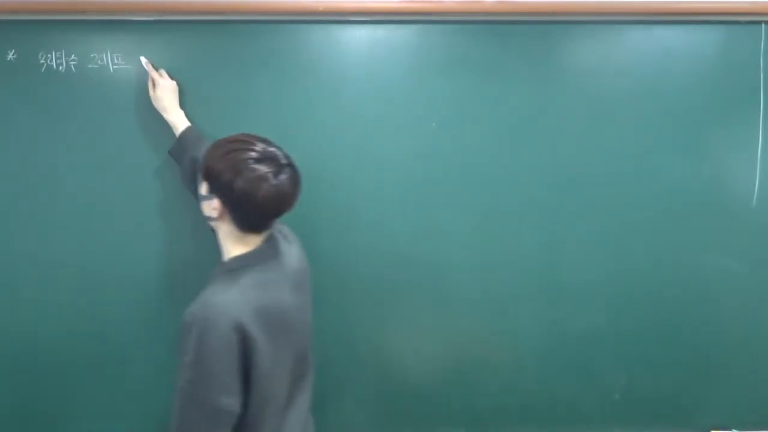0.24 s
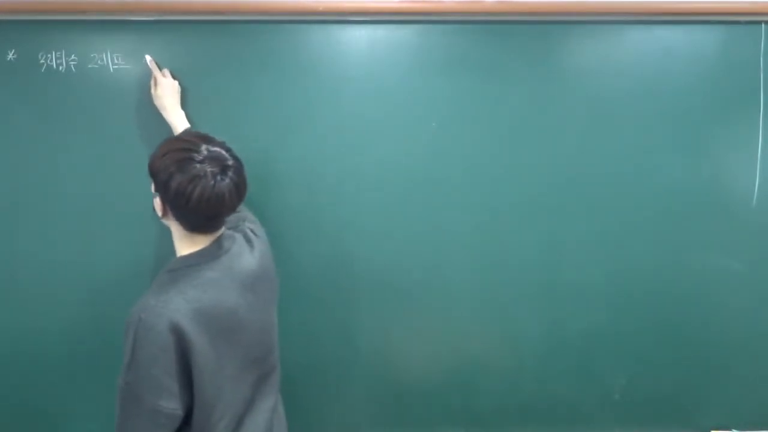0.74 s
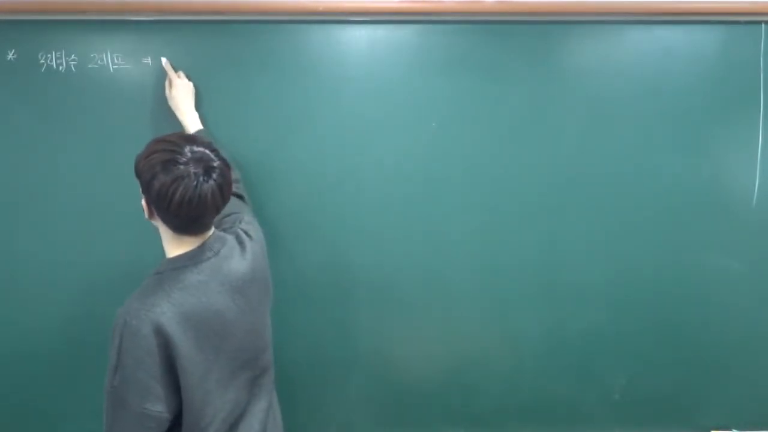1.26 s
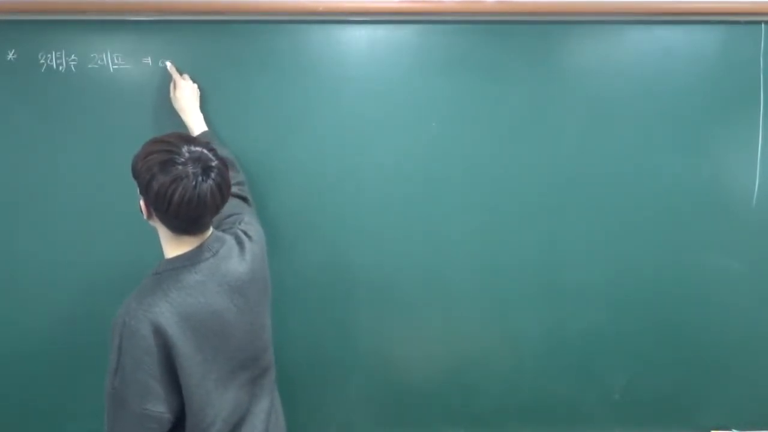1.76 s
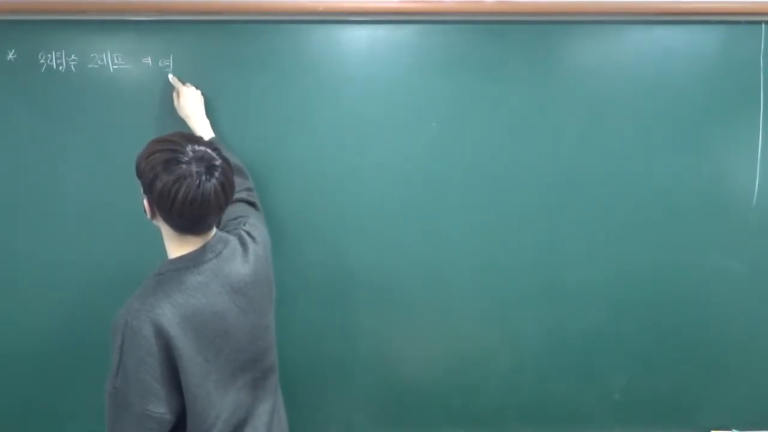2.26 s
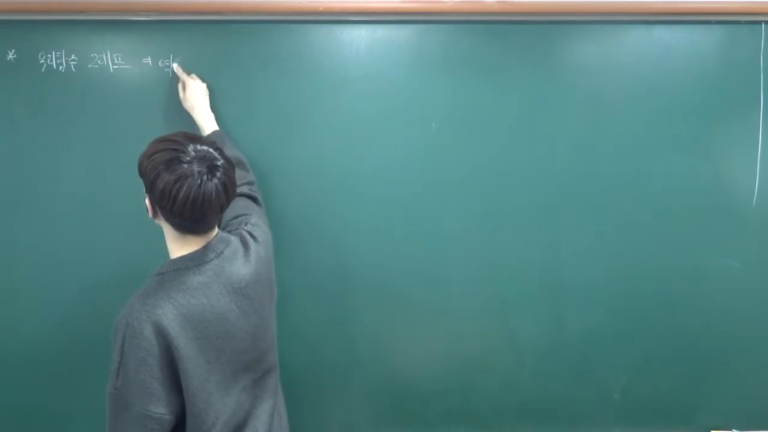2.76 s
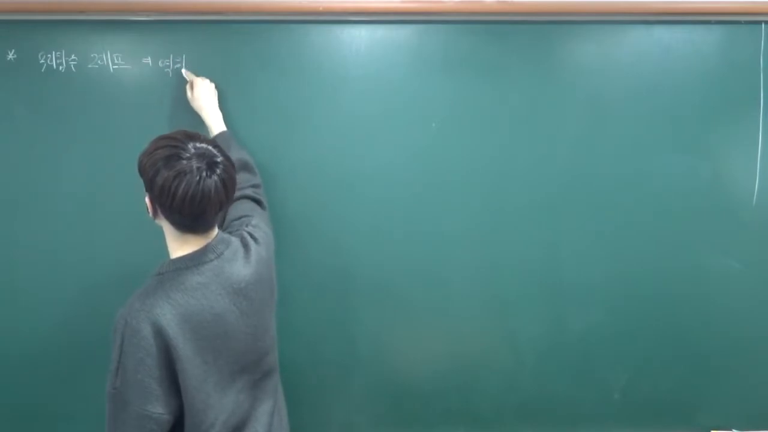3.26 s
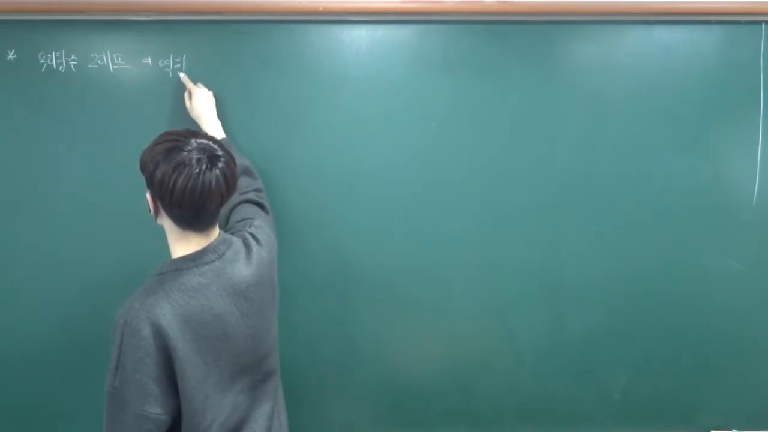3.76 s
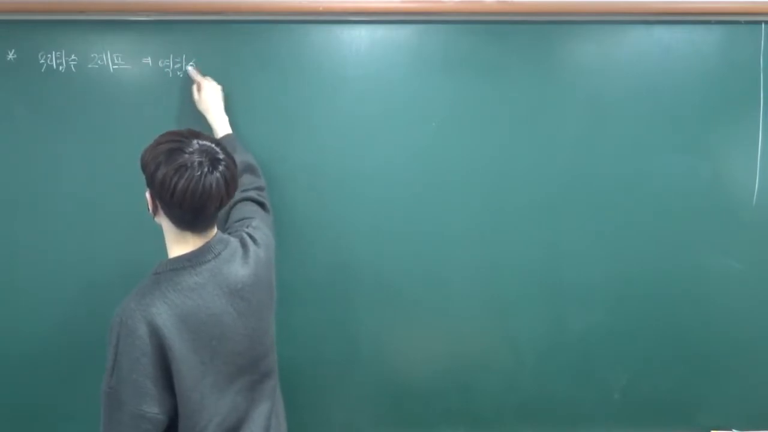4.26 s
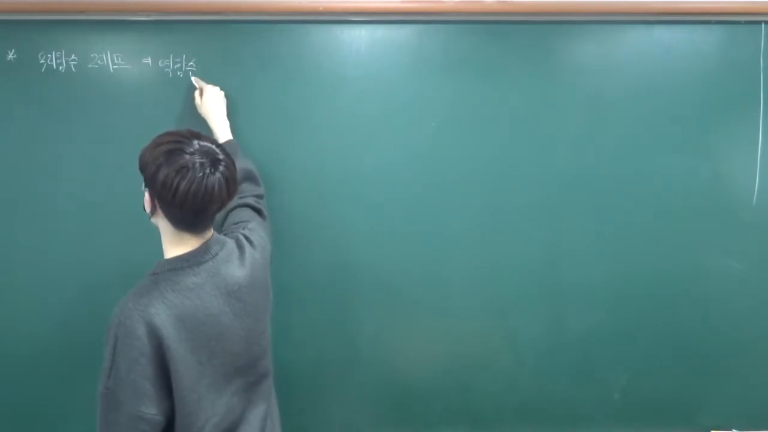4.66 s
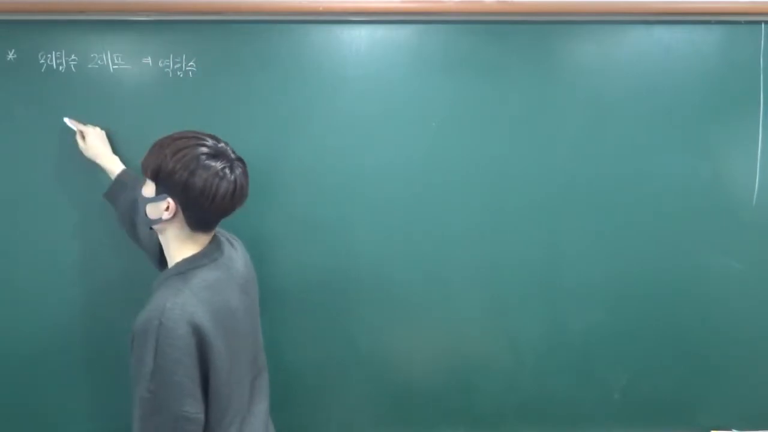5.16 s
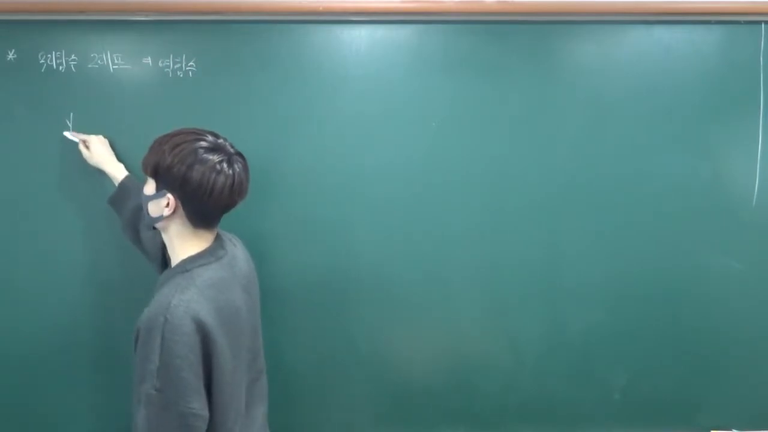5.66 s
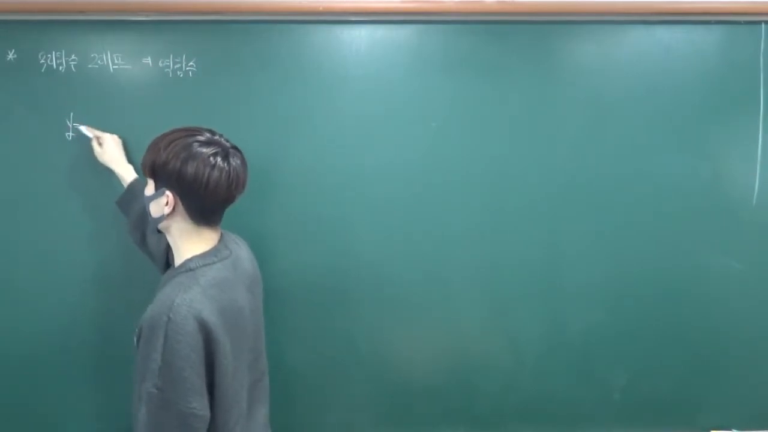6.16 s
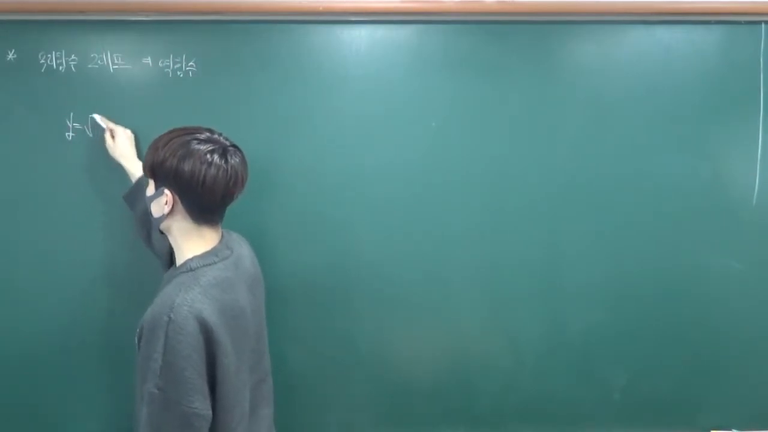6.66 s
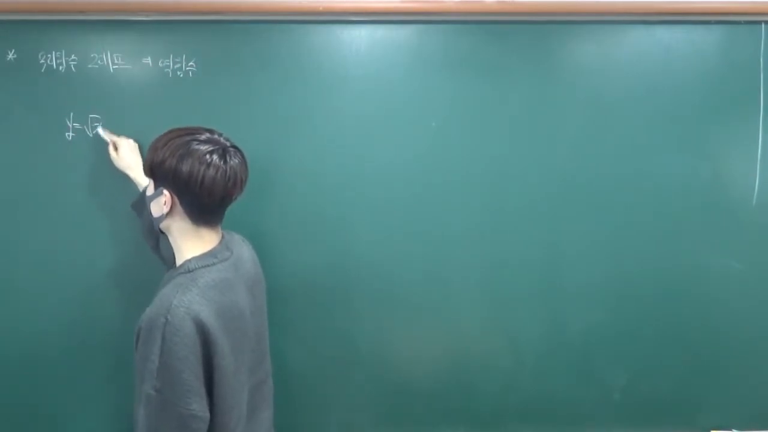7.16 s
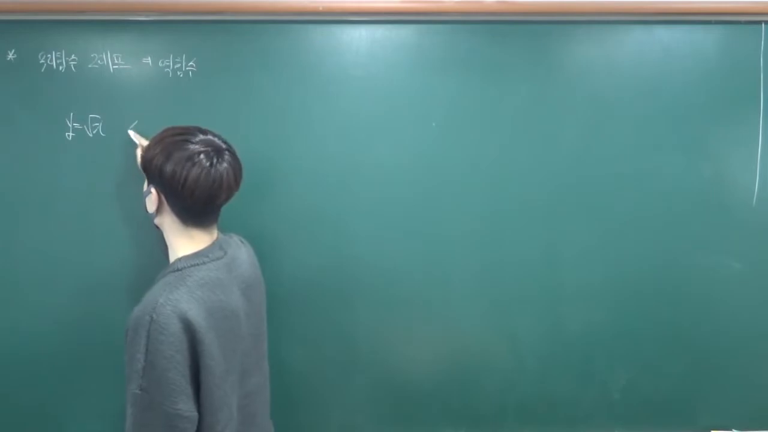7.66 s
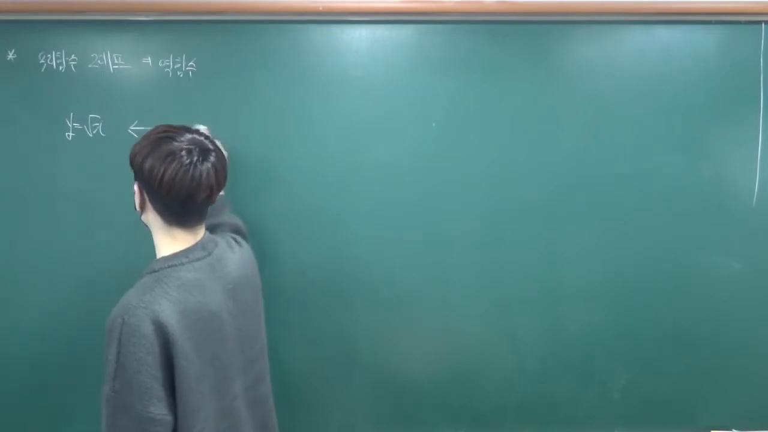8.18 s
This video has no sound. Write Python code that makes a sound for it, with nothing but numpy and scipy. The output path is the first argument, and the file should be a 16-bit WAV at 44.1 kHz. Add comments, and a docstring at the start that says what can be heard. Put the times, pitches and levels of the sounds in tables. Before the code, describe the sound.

Chalk taps and scrapes quickly across a blackboard in a bare classroom, with a few dull bumps over quiet ventilation.

```python
"""Someone writes quickly with chalk on a large blackboard in a bare classroom.
Over quiet ventilation and faint electronic ticking, a scrape and a dull bump come first. Then each
stroke starts with a tap: the tip clicks, the board knocks and the room rings on. A very faint hiss
passes near 1.3 s. Bumps fall between taps, some strokes drag, and the chalk squeaks near 2.4 s. At 5 s
a second line of writing begins, with a slightly different tone. A last drag and a soft bump end it."""
import sys
import numpy as np
from scipy import signal
from scipy.fft import rfft, irfft
from scipy.io import wavfile
from scipy.ndimage import uniform_filter1d

SR = 44100
rng = np.random.default_rng(int(sys.argv[2]) if len(sys.argv) > 2 else 0)


def master_out(mix):
    """Clip the mix to full scale and print it as 16-bit PCM to the path in sys.argv[1]."""
    frames = np.transpose(np.atleast_2d(mix))
    ceiling = np.clip(frames, -1, 1)
    pcm = np.round(ceiling * 32767).astype(np.int16)
    wavfile.write(sys.argv[1], SR, pcm)


N = 371322
T = np.arange(int(.9 * SR)) / SR  # seconds since a hit


def gain_of(db):
    """Turns decibels into a number to multiply by."""
    return 10 ** (np.asarray(db) / 20)


def read(points, hz):
    """Looks up a pitch in a table, sliding smoothly between its rows."""
    f, value = np.transpose(points)
    return np.interp(np.log(hz + 1), np.log(f + 1), value)


def unit(x):
    """Scales a sound to an energy of one."""
    return x / np.sqrt(np.sum(x ** 2, -1, keepdims=True) + 1e-20)


def add(mix, s, sound):
    """Lays a sound into the mix at s seconds."""
    part = mix[:, max(round(s * SR), 0):][:, :sound.shape[-1]]
    part += sound[..., :part.shape[1]]


def colour(x, db_at, size=4096):
    """Changes the tone: turns each pitch up or down by db_at(Hz) decibels."""
    log_gain = np.log(gain_of(db_at(abs(np.fft.fftfreq(size, 1 / SR)))))
    kernel = np.fft.ifft(np.exp(np.conj(signal.hilbert(log_gain)))).real[:size // 2]
    return signal.oaconvolve(x, kernel[None], axes=1)[:, :x.shape[1]]


# how strong the side is next to the mid: f/Hz, level/dB
STEREO_WIDTH = [(60, -17), (500, -17.5), (1100, -19.5), (1800, -20.5), (2500, -13), (3700, -23),
                (4600, -14), (5150, 0), (5900, -12.5), (7200, -17), (10000, -16), (15000, -68)]
def diffuse(noise):
    """Sound from all around. Row 0 (mid) is what left and right share; row 1 (side) sets them apart."""
    return np.vstack([noise[:1], colour(noise[1:], lambda hz: read(STEREO_WIDTH, hz))])


# tone of the moving air: f/Hz, level/dB
AIR_TONE = [(22, -14), (38, -9), (55, 8), (75, -0.5), (120, -1.5), (250, -6), (500, -12.5), (1000, -15.5),
            (2000, -18.5), (4500, -31.5), (8000, -31), (16000, -25)]
def ventilation(air_db=-25, rumble_hz=70, rumble_start_db=-8.5, rise_s=3.7):
    """A steady rush of air with a thin hiss on top; its deepest rumble slowly grows."""
    noise = diffuse(rng.standard_normal((2, N)))
    air = gain_of(air_db) * colour(noise, lambda hz: read(AIR_TONE, hz), size=8192)
    thin = colour(air, lambda hz: rumble_start_db / (1 + (hz / rumble_hz) ** 4), size=8192)
    grown = np.minimum(np.arange(N) / SR / rise_s, 1) ** 2
    return thin + grown * (air - thin)


def blip(hz, db, length):
    """A short tone that swells and fades."""
    t = np.arange(int(length * SR)) / SR
    return gain_of(db) * np.hanning(len(t)) * np.sin(2 * np.pi * (hz * t + rng.random()))


# the two tones of a tick: f/Hz, level/dB, length/s
TICK_TONES = [(2635, -48.5, .009), (3970, -58, 0.015)]
def ticking(first_s=0.011, ticks_per_s=29.97, uneven_db=1.4, waver=0.0091):
    """Faint, regular electronic blips, a little uneven in strength and pitch."""
    out = np.zeros((2, N))
    times = np.arange(first_s, N / SR, 1 / ticks_per_s)
    for hz, db, length in TICK_TONES:
        for s, (strength, bend) in zip(times, rng.standard_normal((len(times), 2))):
            tick = blip(hz * (1 + waver * bend), db + uneven_db * strength, length)
            add(out[:1], s - length / 2, tick)
    return out


# how long board and room ring together: f/Hz, time to fade by 60 dB/s
RING_TIMES = [(100, 1), (250, 0.91), (500, 0.49), (1200, .48), (3000, 0.4), (7000, 0.42), (15000, 0.26)]
def room_ring(noise, size=256):
    """Countless echoes blur into one tail, in which each pitch fades at its own speed."""
    hz, t, spectrum = signal.stft(noise, SR, nperseg=size)
    fade = gain_of(-60 * t / read(RING_TIMES, hz)[:, None])
    tail = signal.istft(spectrum * fade, SR, nperseg=size)[1]
    return diffuse(unit(tail[:, :len(T)]))


# the board's own notes: f/Hz, level/dB, time to fade by 60 dB/s
BOARD_NOTES = [(127.8, -19, 0.96), (277.4, -26.5, 0.83), (453.3, -21, 0.47), (653.4, -26, 0.33),
               (676.6, -23, 0.055), (732, -29, 0.43), (1070, -30.5, 0.46), (1306, -33, 0.31)]
def board():
    """One hit sets all the notes ringing; the square root evens out long and short notes' energy."""
    return sum(gain_of(db - 60 * T / fade_s) * np.sin(2 * np.pi * hz * T)
               / np.sqrt(fade_s * SR / np.log(1e12)) for hz, db, fade_s in BOARD_NOTES)


# dull bumps: t/s, level/dB, boom f/Hz, rise time/s
BUMP_HITS = [(0.0475, 24, 343, 0.0013), (1.366, 22, 208, 0.0022), (1.82, 21, 209, 0.01),
             (1.938, 27, 289, 0.0024), (5.728, 9.5, 320, .0075), (8.33, 2, 211.6, 0.034)]
# tone of a bump's knock: f/Hz, level/dB
KNOCK_TONE = [(60, -62), (200, -24.5), (650, 2), (1300, -2.5), (2200, -14.5), (4000, -29), (8000, -33.5),
              (16000, -33)]
def bumps(width_hz=45, boom_db=3.5, hum_db=5, firm_s=.001):
    """Soft, heavy hits: a low boom sets the board humming, and the softer the hit, the less it knocks."""
    out = np.zeros((2, N))
    for s, db, boom_hz, rise_s in BUMP_HITS:
        knock_db = 1 - 5 * np.log2(rise_s / firm_s)  # 5 dB less each time the rise time doubles
        rise = 1 - np.exp(-T / rise_s)
        tail = room_ring(rng.standard_normal((2, len(T))) * rise)
        knock = colour(tail, lambda hz: knock_db + read(KNOCK_TONE, hz))
        boom_tone = lambda hz: -20 * np.log10(1 + ((hz - boom_hz) / width_hz) ** 2 / 2)
        tail[:1] += gain_of(hum_db) * colour(board()[None] * rise, boom_tone)
        boom = gain_of(boom_db) * colour(tail, boom_tone)
        add(out, s, gain_of(db) * (boom + knock))
    return out


def squeak(s=2.3715, hz=2660, db=-33, length_s=.011):
    """The chalk sticks and slips very fast for a moment."""
    out = np.zeros((2, N))
    add(out[:1], s - length_s / 2, blip(hz, db, length_s))
    return out


# a very faint, brief hiss near 1.3 s; in the other rows the chalk drags: t/s, length/s, level/dB
HISS_TIMES = [(0.042, 0.087, -31.5), (1.316, 0.058, -57), (2.208, 0.45, -48.5), (2.817, 0.3, -43.5),
              (3.76, 0.19, -53), (4.797, 0.23, -48.5), (5.55, 0.28, -55.5), (6.533, 0.079, -49),
              (6.65, 0.096, -57), (6.958, 0.067, -51.5), (7.648, 0.2, -49.5), (8.026, 0.19, -47)]
# tone of the hiss: f/Hz, level/dB
HISS_TONE = [(100, -4), (600, 17), (1500, -2.5), (4000, -6.5), (7000, -3), (11000, -2), (16000, 0)]
def hisses(grains_per_s=4000, spread_db=3, catch_db=3.5, level_db=-1, direct_db=-4):
    """Tiny clicks that the room smears into a hiss. Where chalk drags, they are its crumbling grains."""
    swell = np.zeros((1, N))
    for s, length, db in HISS_TIMES:
        add(swell, s, gain_of(db) * signal.windows.tukey(int(length * SR), .6))
    catch = uniform_filter1d(rng.standard_normal(N), size=900)  # a flutter, like catching and letting go
    size_db = spread_db * np.minimum(rng.exponential(1, N), 4) + catch_db * catch / catch.std()
    grains = rng.standard_normal(N) * gain_of(size_db) * (rng.random(N) < grains_per_s / SR)
    hiss = colour(swell * grains / grains.std(), lambda hz: level_db + read(HISS_TONE, hz))
    room = room_ring(rng.standard_normal((2, len(T))))
    room[0, 0] += gain_of(direct_db)  # the part that comes straight to the ear
    return signal.fftconvolve(hiss, room, axes=1)[:, :N]


THUD_HZ, RING_HZ, KNOCK_HZ = 285, 611, 1500  # the board's low, middle and high ranges
# the tip only brushes the board: t/s, level/dB
LIGHT_TOUCHES = [(3.722, -13), (4.2368, 0)]
# their thin tone, as the board hardly moves: f/Hz, level/dB
LIGHT_TONE = [(600, -34), (1500, -27), (4300, 1), (11500, -1.5)]
# the chalk lands to start a stroke: t/s, level/dB, hardness as extra treble/dB
LANDINGS = [(0.3183, 4.5, -14.5), (0.58, 4.5, -13), (0.8398, 3.5, -6.5), (1.145, 4, -4), (1.5576, .5, 1),
            (1.7309, 1.5, -1), (1.947, 1, -2), (2.1543, -2, -4.5), (2.4808, 4.5, 0.5), (2.6458, 6, -3),
            (2.812, 3, -1.5), (3.1741, 4, -2.5), (3.4092, 1.5, -5.5), (3.565, 4.5, -1), (4.0027, .5, 2.5),
            (4.361, 1.5, 1.5), (4.572, 2, 3), (4.7417, 0, -3), (5.1726, 3.5, -0.5), (5.4022, -3, 2.5),
            (5.9268, 1.5, 2.5), (6.115, -.5, 0), (6.319, 0.5, 2), (6.84, -1, -0.5), (7.1306, -1, -5),
            (7.318, -3, -6.5), (7.5136, 0.5, 2.5), (7.9293, 2.5, -7.5)]
# a harder hit is shorter and so brighter: f/Hz, share of the hardness (0-1)
HARDNESS_SHARE = [(600, 0), (1500, 0.4), (4300, 0.38), (11500, 0.99)]
# each spot the hand moves to sounds different: from t/s, thud level/dB, ring level/dB
BOARD_SPOTS = [(0, -6, -9), (1, -4, -0.5), (3.8, -2, -0.9), (4.65, -8, -1.7), (5, 4, -0.4)]
def contacts():
    """Lists every touch of the chalk in order of time, with its strength and its tone."""
    touches = [(s, force_db, LIGHT_TONE) for s, force_db in LIGHT_TOUCHES]
    hz = np.union1d([THUD_HZ, RING_HZ, KNOCK_HZ], np.transpose(HARDNESS_SHARE)[0])
    for s, force_db, hard_db in LANDINGS:
        _, thud_db, ring_db = [spot for spot in BOARD_SPOTS if spot[0] <= s][-1]
        spot_db = read([(THUD_HZ, thud_db), (RING_HZ, ring_db), (KNOCK_HZ, 0)], hz)
        tone_db = spot_db + hard_db * read(HARDNESS_SHARE, hz)
        touches.append((s, force_db, list(zip(hz, tone_db))))
    return sorted(touches)


# tone of a typical tap: f/Hz, level/dB
TAP_TONE = [(30, -4), (60, 10.5), (120, 9.5), (200, 14.5), (330, 19), (450, 25), (650, 27.5), (850, 23),
            (1250, 22.5), (1600, 15), (2000, 16), (4200, -1), (10000, -1), (15500, -2)]
# change of tone on the second line of writing: f/Hz, level/dB
SECOND_LINE_TONE = [(150, -7), (250, 1), (350, 0), (560, 1), (1050, 1.5), (1450, 0), (2100, 0.5), (2600, 0),
                    (3100, 4.5), (3400, 2.5), (3800, -0.5)]
# how alike one tap and the next ring: f/Hz, likeness (0-1)
TAP_LIKENESS = [(200, 0.76), (700, 0.66), (1500, 0.5), (3000, 0.3), (8000, 0.24)]
def taps(tip_db=-8, tip_hz=6500, wave_db=-9, wave_s=0.001325, crack_db=-13, crack_s=0.002,
         rap_db=-19, rap_s=0.0038, rap_hz=2500, echo_db=-9, echo_s=.0063, echo_fade_s=0.0039,
         room_db=-0.5, build_s=0.006, second_line_s=5):
    """The tip clicks, the board bends and raps, a near echo returns, then board and room ring on."""
    out = np.zeros((2, N))
    paths = rng.standard_normal((4, len(T)))  # noise stands for the many routes the sound takes
    hz = np.fft.rfftfreq(len(T), 1 / SR)
    alike = np.clip(read(TAP_LIKENESS, hz), 0, 1)
    tip = gain_of(tip_db) * irfft(1j * hz / (tip_hz + 1j * hz), len(T))
    # low notes cross the board more slowly: RING_HZ arrives wave_s after the click
    wave = gain_of(wave_db) * irfft(np.exp(-4j * np.pi * wave_s * np.sqrt(RING_HZ * hz)), len(T))
    direct = (tip + wave) * (T < T[-1] / 2) + board()
    since_echo = np.maximum(T - echo_s, 0)
    for s, force_db, touch_tone in contacts():
        # the hand moves on a little, which changes the high echoes most
        fresh = rfft(rng.standard_normal(paths.shape))
        paths = irfft(alike * rfft(paths) + np.sqrt(1 - alike ** 2) * fresh, len(T))
        crack = unit(paths[2] * np.exp(-T / crack_s))
        rap = colour(paths[3:] * np.exp(-T / rap_s), lambda f: -10 * np.log10(1 + (f / rap_hz) ** 4))
        echo = unit(paths[2] * (since_echo > 0) * np.exp(-since_echo / echo_fade_s))
        hit = gain_of(room_db) * room_ring(paths[:2] * (1 - np.exp(-T / build_s)))
        hit[0] += direct + gain_of(crack_db) * crack + gain_of(echo_db) * echo
        hit[:1] += gain_of(rap_db) * unit(rap)
        tone = lambda f: (force_db + read(TAP_TONE, f) + read(touch_tone, f)
                          + (s > second_line_s) * read(SECOND_LINE_TONE, f))
        add(out, s, colour(hit, tone))
    return out


def scene():
    """Adds up all the sounds and turns mid and side into left and right."""
    mid, side = taps() + hisses() + squeak() + bumps() + ventilation() + ticking()
    return np.array([mid + side, mid - side])


# tone of the microphone: f/Hz, level/dB
MIC_TONE = [(2600, -2.5), (3100, 1), (3600, -2.5), (4100, 4.5), (4800, 0.5), (5200, -3), (6000, 9.5),
            (7700, 8), (8900, 2), (11500, -1), (16000, -10)]
# how much louder left is than right: f/Hz, level/dB
LEFT_OVER_RIGHT = [(60, 0), (170, 3), (400, 2), (700, 2), (900, 0), (1950, 0.4), (2450, -6.5), (2750, -2.5),
                   (2950, -2.5), (3900, 2), (4950, -8), (5350, 4.5), (7000, -0.5), (11000, 0.5)]
def record(dry, top_hz=16100):
    """The microphone colours the sound, hears left and right unequally and cuts the highest treble."""
    tilt_db = read(LEFT_OVER_RIGHT, np.fft.rfftfreq(512, 1 / SR)) / 2
    balance = np.fft.fftshift(irfft(gain_of([tilt_db, -tilt_db])), axes=1)[:, 1:]
    heard = signal.oaconvolve(colour(dry, lambda hz: read(MIC_TONE, hz)), balance, "same", axes=1)
    treble_cut = signal.firwin(511, top_hz, window=("kaiser", 9), fs=SR)
    return signal.oaconvolve(heard, treble_cut[None], "same", axes=1)


dry = scene()
out = record(dry)
master_out(out)
```